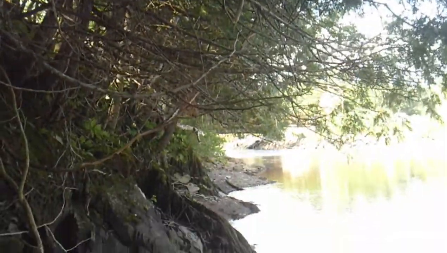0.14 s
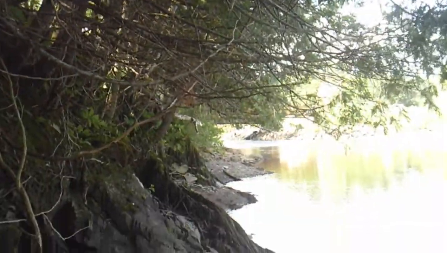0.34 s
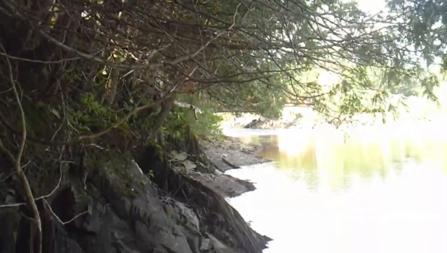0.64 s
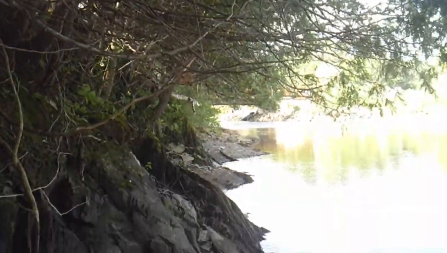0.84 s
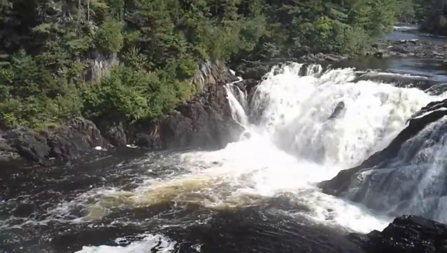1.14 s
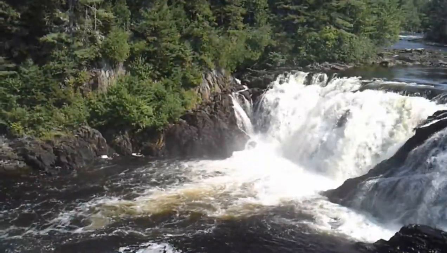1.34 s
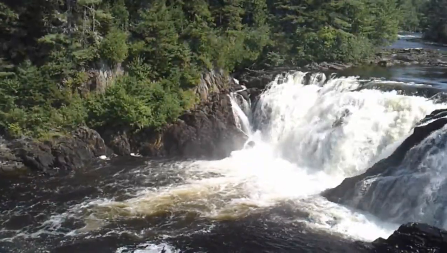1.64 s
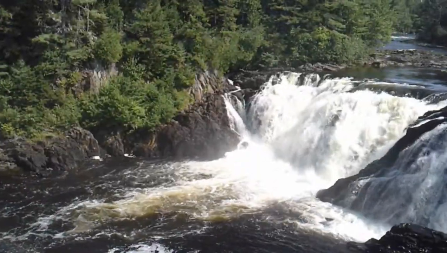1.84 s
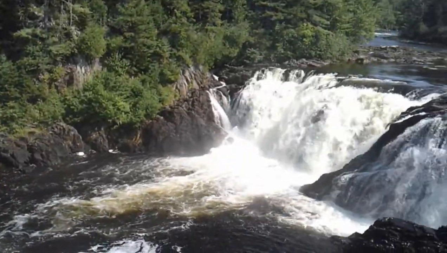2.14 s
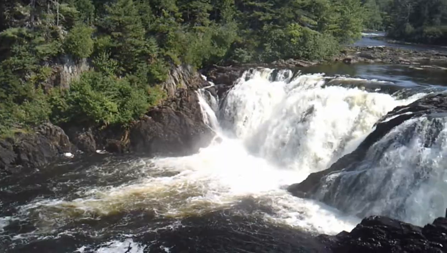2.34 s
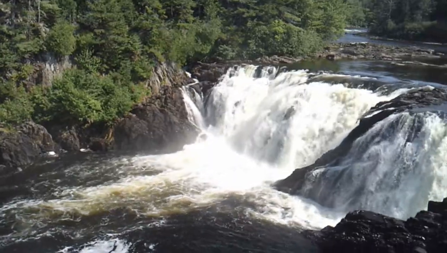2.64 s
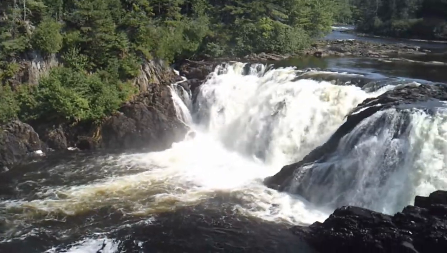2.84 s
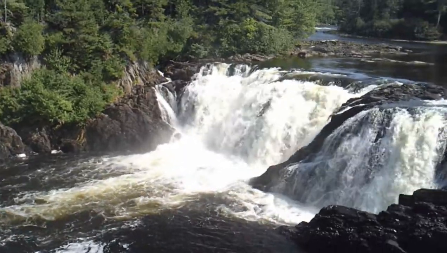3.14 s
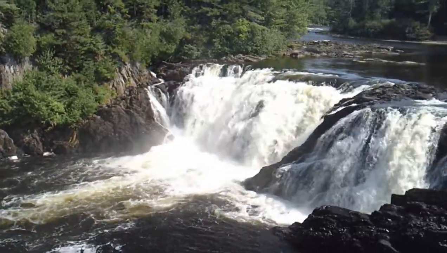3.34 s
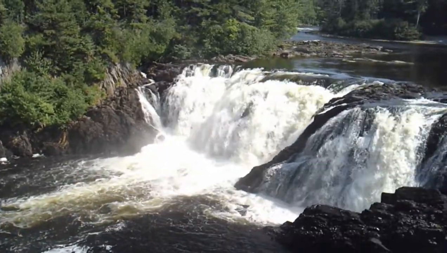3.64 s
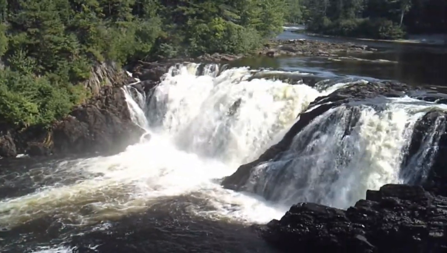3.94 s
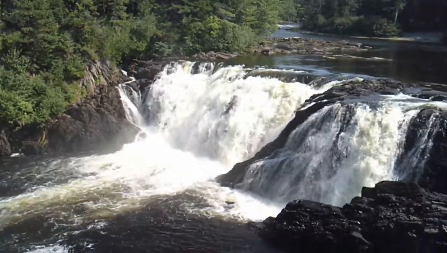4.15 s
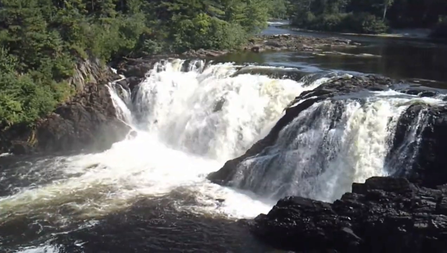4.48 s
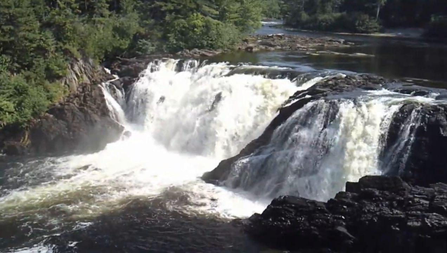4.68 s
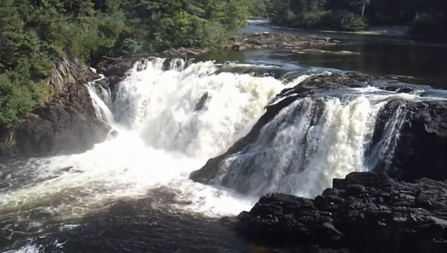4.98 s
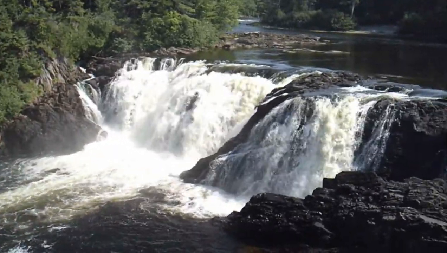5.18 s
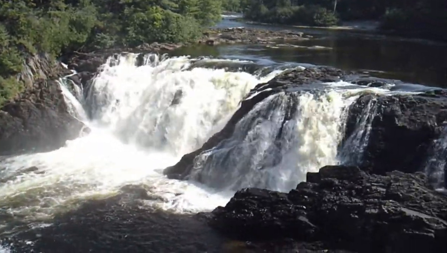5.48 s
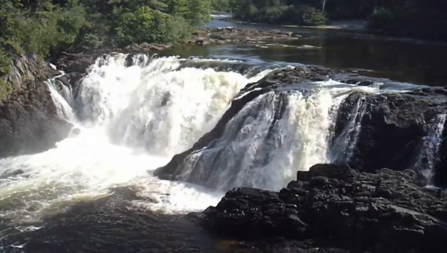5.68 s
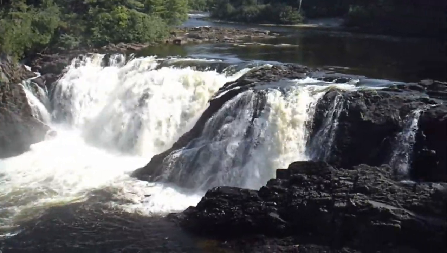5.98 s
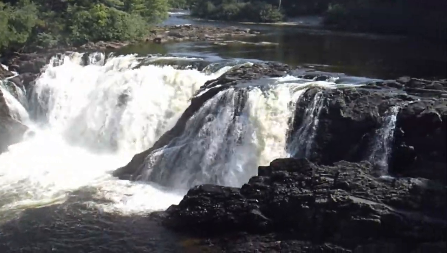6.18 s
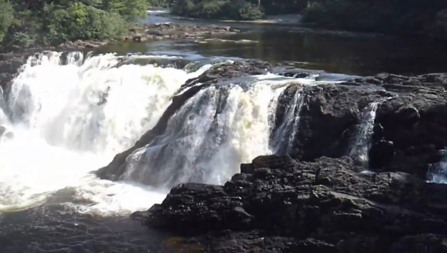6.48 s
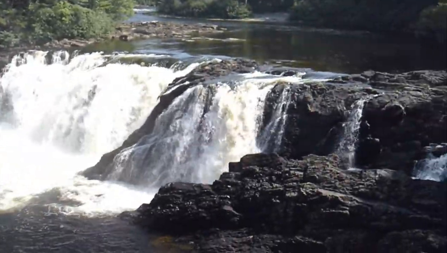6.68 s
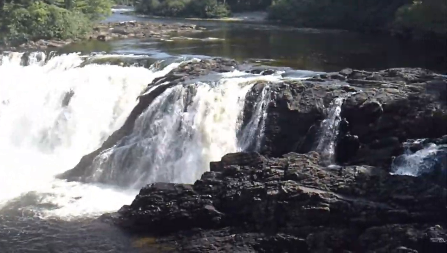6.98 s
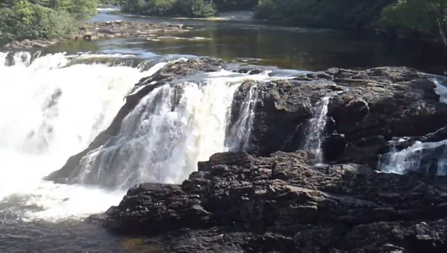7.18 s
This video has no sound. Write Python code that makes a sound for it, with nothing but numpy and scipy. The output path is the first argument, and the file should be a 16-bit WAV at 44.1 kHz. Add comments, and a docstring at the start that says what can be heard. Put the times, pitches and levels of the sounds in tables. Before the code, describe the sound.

Faint cricket trills over distant water murmur cut abruptly to a close, blasting whitewater roar, which drops in level five times while rushing steadily.

```python
"""A waterfall close by: whitewater roars as band-shaped noise and air pockets ring and gulp through it.
Soft low thumps, single swings of pressure, sound a few at set moments, the rest at random;
the recorded level of the roar falls in five steps. Before the cut to it lies a quiet river bank: crickets
trill as gliding tones over a far murmur of noise, with a dull knock of two modes and a puff of wind noise.
The microphone is mono and narrow in band; its input saturates, and it overloads briefly at the cut."""
import sys
import numpy as np
from scipy import signal
from scipy.fft import rfft, irfft, next_fast_len
from scipy.io import wavfile

SR = 44100
rng = np.random.default_rng(int(sys.argv[2]) if len(sys.argv) > 2 else 0)


def wav_out(sig):
    """Save sig, one row per channel (or a flat mono array), as 16-bit PCM at SR to the path in sys.argv[1]."""
    wavfile.write(sys.argv[1], SR, np.round(np.clip(np.atleast_2d(sig).T, -1, 1) * 32767).astype(np.int16))


N = 322812
TIME = np.arange(N) / SR

# Recorded level of the roar, held from each step to the next: start_s, level_db, extra_bass_db
ROAR_STEPS = [(1.071, -9.5, -6), (1.254, -15.5, 0.5), (2.529, -19.5, -1.5), (3.815, -24.5, -4),
              (4.905, -29.5, 2), (5.992, -33, 3.5)]
STEP_RAMP_S = 0.009
# Relative spectral density of the roar: frequency_hz, density_db (per Hz)
ROAR_SPECTRUM = [(25, -39), (45, -31), (90, -18), (160, -8.5), (290, -5), (450, -2.5), (620, 1.1),
                 (1000, -0.6), (1400, -2.5), (2100, -4.5), (3300, -5.5), (4100, -9), (4750, -5), (5500, -8)]
# Heavier masses of water landing: centre_s, level_over_roar_db, gaussian_width_s
WATER_SURGES = [(3.496, -4.5, 0.011), (4.6, -4.0, .022)]
# Low thumps at set moments: centre_s, peak_db
SET_THUMPS = [(1.185, -35), (1.225, -43), (2.11, -47), (5.54, -50)]
# Further soft thumps: one at a random moment in each of a row of equal slots
THUMPS_FROM_S, THUMPS_UNTIL_S, THUMPS_PER_S, THUMP_DB = 1.1, 5.9, 2.6, -50.5

# Crickets, one a row: strokes_per_s, pitch_hz (towards which each stroke glides), direct_level_db
CRICKETS = [(52.4, 3725, -54.5), (46.8, 3940, -62)]
# Modes of the knocked object: frequency_hz, level_db (relative to the blow), t60_s
HOLLOW_MODES = [(186, 2, 0.25), (307, -16, .12)]
BLOW_S, BLOW_DB = 0.459, -43.5
# Relative spectral density of wind on the microphone, before its low-pass: frequency_hz, density_db (per Hz)
WIND_SPECTRUM = [(20, -11), (85, 5), (140, -7.5), (250, -15.5), (600, -35)]
PUFF_S, PUFF_ATTACK_S, PUFF_HOLD_S, PUFF_RELEASE_S = 0.496, 0.07, 0.12, 0.06
CALM_DB, PUFF_DB, BREEZE_DB = -74, -51, -62  # before the low-pass; the last two add to the calm
# Relative spectral density of the far water: frequency_hz, density_db (per Hz)
MURMUR_SPECTRUM = [(25, 4), (70, -14), (140, -17), (225, -5.5), (280, -13), (400, -4), (620, -0.5),
                   (700, -1.5), (790, 2.5), (950, -4.5), (1200, -6), (2100, -13), (4500, -14.5),
                   (5400, -12.5)]
MURMUR_DB = -47.5

MIC_TOP_HZ, MIC_STOP_HZ, CUTOFF_HZ = 4980, 6850, 12400


def waterfall(pockets_db=-13.0, churn_db=0.14, bass_hz=260):
    """Superposition: countless splashes merge to a roar; the larger air pockets gulp through it."""
    level_db, bass_db = stepped_level_and_bass()
    roar = rush(ROAR_SPECTRUM, patchy_db=0.4, flicker_rate=11)
    pockets = air_pockets(per_s=1600, low_hz=282.7, high_hz=1425, cycles=16, spread_db=2.5)
    gulps = from_db(pockets_db) * pockets

    landing = np.zeros(N)
    for centre_s, over_roar_db, width_s in WATER_SURGES:
        landing += from_db(over_roar_db) * np.exp(-0.5 * ((TIME - centre_s) / width_s) ** 2)
    surges = landing * air_pockets(per_s=8300, low_hz=454, high_hz=1390, cycles=6.4, spread_db=-1.5)

    churn = from_db(churn_db * drift(2.6))
    water = (roar + gulps + surges) * churn
    # the weight of the bass shifts from step to step
    bass = butter(water, bass_hz, "low", order=1)
    water = water + (from_db(bass_db) - 1) * bass
    return from_db(level_db) * water


def stepped_level_and_bass():
    """Piecewise-constant gain: recorded level and bass in dB hold until a short ramp to the next step."""
    rows = np.array(ROAR_STEPS)
    held = np.outer(rows[0, 1:], np.ones(N))
    for before, after in zip(rows, rows[1:]):
        ramp = np.clip((TIME - after[0]) / STEP_RAMP_S, 0, 1)
        held += np.outer(after[1:] - before[1:], ramp)
    return held


def rush(spectrum, patchy_db, flicker_rate, count=9):
    """Turbulence as shaped noise whose octaves swell and fade independently; unit rms."""
    size = next_fast_len(N, real=True)
    hz = np.maximum(np.arange(size // 2 + 1) * SR / size, 1)
    points_hz, points_db = np.transpose(spectrum)
    density_db = np.interp(np.log(hz), np.log(points_hz), points_db)
    noise = rfft(rng.standard_normal(size)) * from_db(density_db)
    noise = noise * (hz < 7000)
    octave = np.floor(np.log2(hz / 14))  # octave 0 begins at 14 Hz
    total = np.zeros(N)
    for k in range(count):
        band = irfft(noise * (octave == k), size)[:N]
        total += band * from_db(patchy_db * drift(flicker_rate))
    return rms_one(total)


def air_pockets(per_s, low_hz, high_hz, cycles, spread_db, count=18):
    """Bubble resonance: trapped air of many sizes rings, each decaying 60 dB in some cycles; unit rms."""
    strength_db = spread_db * np.minimum(rng.exponential(1, N), 4)
    impulses = from_db(strength_db) * rng.choice([-1, 1], N)
    born = rng.random(N) < per_s / SR
    pitch_index = rng.integers(0, count, N)
    ringing = np.zeros(N)
    for k, hz in enumerate(np.geomspace(low_hz, high_hz, count)):
        ringing += ring(impulses * born * (pitch_index == k), hz, cycles / hz)
    return rms_one(butter(ringing, low_hz, "high"))


def thumps(width_s=0.0031, spread_db=2.5):
    """Pressure pulse: each thump is one slow swing; the further ones are uneven in time and strength."""
    slots = np.arange(THUMPS_FROM_S, THUMPS_UNTIL_S - 1 / THUMPS_PER_S, 1 / THUMPS_PER_S)
    delay, size = rng.random((len(slots), 2)).T
    further_s = slots + delay / THUMPS_PER_S
    further_db = THUMP_DB + spread_db * (2 * size - 1)
    total = np.zeros(N)
    for centre_s, peak_db in [*SET_THUMPS, *zip(further_s, further_db)]:
        u = np.clip((TIME - centre_s) / width_s, -10, 10)
        total += from_db(peak_db) * u * np.exp(0.5 * (1 - u ** 2))  # extremes of height 1 at u = -1 and 1
    return total


def cricket(strokes_per_s, pitch_hz, direct_level_db, glide_hz=420, settle=0.32, peak_at=0.65, width=0.18,
            uneven_db=2.5, scatter_db=-9.0, scatter_s=0.038):
    """Stridulation: each wing stroke is a tone sliding to resonance; rocks and twigs scatter it."""
    # settle, peak_at and width are fractions of a stroke
    stroke = np.cumsum(strokes_per_s * (1 + 0.018 * drift(10.5))) / SR % 1
    glide = glide_hz / (1 + (stroke / settle) ** 4)
    hz = pitch_hz + glide + 18 * drift(85)
    # the stroke starts softly and is loudest once the wing rings freely
    swell = np.exp(-0.5 * ((stroke - peak_at) / width) ** 2)
    loudness = swell + 0.41 * np.sqrt(np.sin(np.pi * stroke))
    tone = np.sin(2 * np.pi * np.cumsum(hz) / SR)
    song = loudness * from_db(uneven_db * drift(100)) * tone

    lag = TIME[:SR // 8]
    echoes = rng.standard_normal(len(lag)) * np.exp(-lag / scatter_s)
    scattered = rms_one(signal.fftconvolve(song, echoes)[:N])
    return from_db(direct_level_db) * (rms_one(song) + from_db(scatter_db) * scattered)


def knock(soft_hz=500, swell_s=0.004):
    """Modal excitation: a soft contact sets something hollow ringing, and the ring builds gradually."""
    blow = np.zeros(N)
    blow[round(BLOW_S * SR)] = from_db(BLOW_DB)
    modes = sum(from_db(level_db) * ring(blow, hz, t60_s) for hz, level_db, t60_s in HOLLOW_MODES)
    build = 1 - np.exp(-np.maximum(TIME - BLOW_S, 0) / swell_s)
    return butter(modes, soft_hz, "low") * build


def wind():
    """Turbulent pressure on the microphone: a puff rises from calm, holds and dies to a light breeze."""
    age = TIME - PUFF_S
    attack = np.clip(age / PUFF_ATTACK_S, 0, 1)
    release = np.exp(-np.maximum(age - PUFF_ATTACK_S - PUFF_HOLD_S, 0) / PUFF_RELEASE_S)
    puff = attack * np.maximum(from_db(PUFF_DB) * release, from_db(BREEZE_DB))
    strength = from_db(CALM_DB) + puff
    return strength * butter(rush(WIND_SPECTRUM, patchy_db=-0.5, flicker_rate=20), 450, "low")


def far_water():
    """Incoherent summation: distant water merges into a faint murmur of shaped noise."""
    return from_db(MURMUR_DB) * rush(MURMUR_SPECTRUM, patchy_db=0.5, flicker_rate=4.2)


def river_bank():
    """Superposition of the crickets, the knock, the wind and the far water."""
    crickets = sum(cricket(*row) for row in CRICKETS)
    return crickets + knock() + wind() + far_water()


def ring(clicks, hz, t60_s):
    """Damped resonator: a unit click sets a decaying sine of initial height 1 ringing."""
    r = np.exp(-np.log(1000) / (t60_s * SR))
    w = 2 * np.pi * hz / SR
    return signal.lfilter([0, np.sin(w)], [1, -2 * r * np.cos(w), r * r], clicks + 1e-18)


def drift(rate):
    """Low-passed random process: unit rms, changing about rate times a second."""
    # made at a fortieth of the sample rate; the first 2000 values let the filter settle
    r = np.exp(-80 * np.pi * rate / SR)
    noise = rng.standard_normal(N // 40 + 2002)
    slow = signal.lfilter([1], [1, -2 * r, r * r], noise)[2000:]
    return np.interp(np.arange(N) / 40, np.arange(len(slow)), rms_one(slow))


def butter(x, hz, kind, order=2):
    """Causal filtering with a maximally flat (Butterworth) passband."""
    return signal.sosfilt(signal.butter(order, hz, kind, fs=SR, output="sos"), x + 1e-18)


def rms_one(x):
    """Power normalisation: scale to unit rms."""
    return x / np.sqrt(np.mean(x ** 2) + 1e-20)


def from_db(db):
    """Logarithmic level: decibels to amplitude gain."""
    return 10 ** (np.asarray(db) / 20)


def scene():
    """Switched superposition: the bank gives way to the falls at the first step; both channels are alike."""
    after_cut = np.clip((TIME - ROAR_STEPS[0][0]) / 0.001, 0, 1)
    falls = waterfall() + thumps()
    mono = (1 - after_cut) * river_bank() + after_cut * falls
    return np.array([mono, mono])


def record(dry):
    """Saturation and band-limiting: the input rounds off, the treble is cut and the highest peaks clip."""
    headroom, ceiling = 0.76, 0.68  # fractions of full scale
    rounded = dry / (1 + (dry / headroom) ** 6) ** (1 / 6)
    narrow = butter(rounded, MIC_TOP_HZ, "low", order=12)
    treble_stop = signal.cheby2(16, 70, MIC_STOP_HZ, fs=SR, output="sos")  # 70 dB down from the stop edge
    narrow = signal.sosfilt(treble_stop, narrow)
    clipped = np.clip(narrow, -ceiling, ceiling)
    return butter(clipped, CUTOFF_HZ, "low", order=20)


dry = scene()
out = record(dry)
wav_out(out)
```